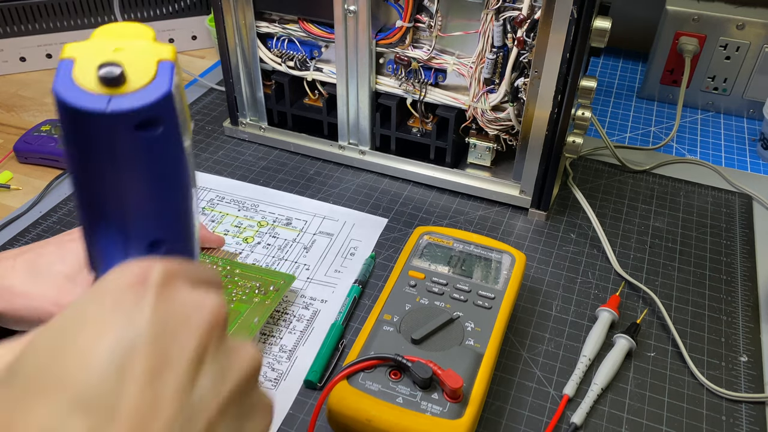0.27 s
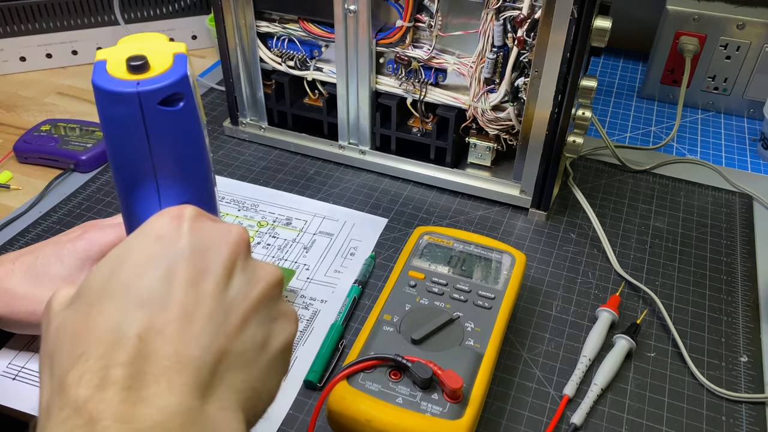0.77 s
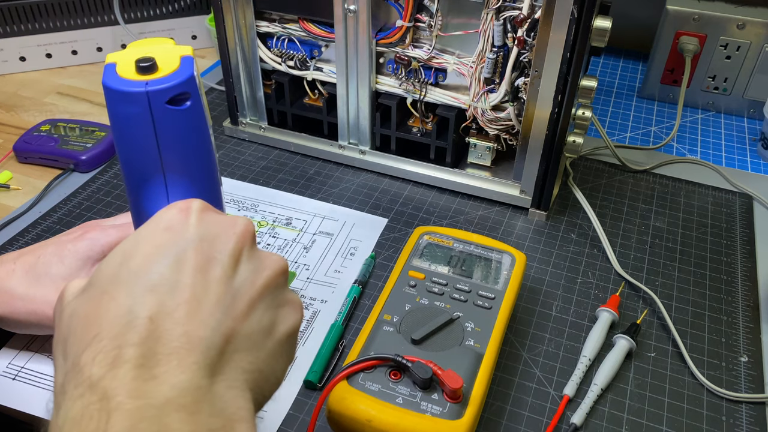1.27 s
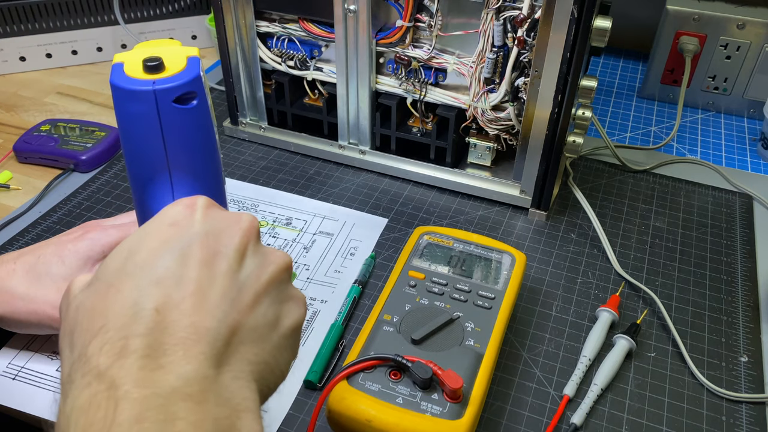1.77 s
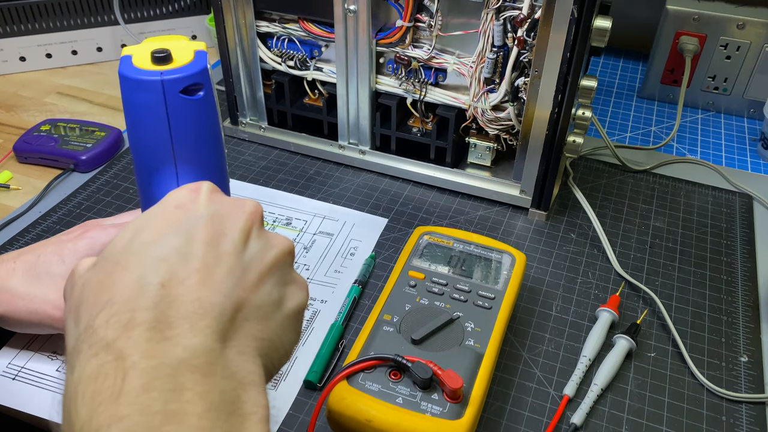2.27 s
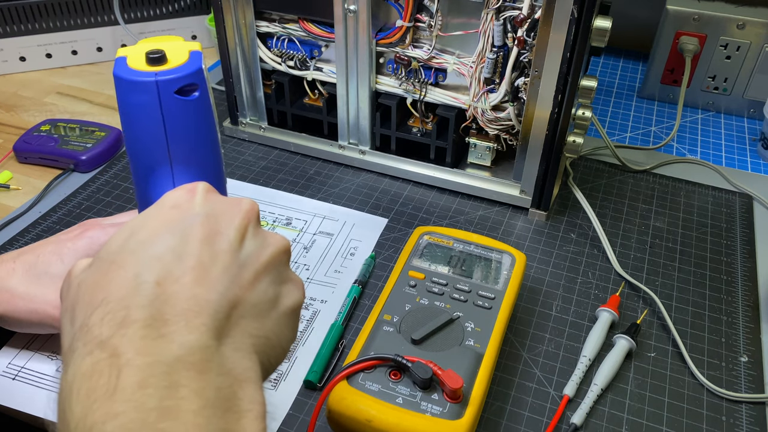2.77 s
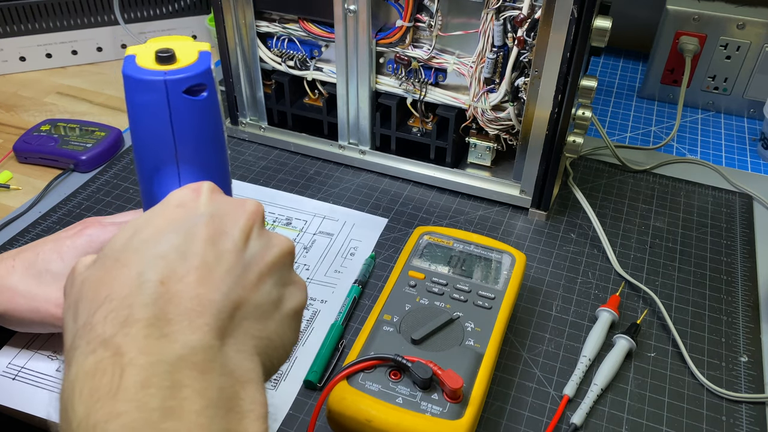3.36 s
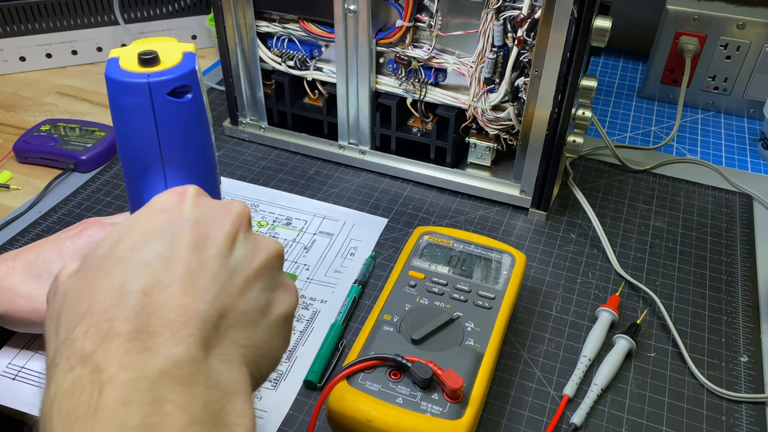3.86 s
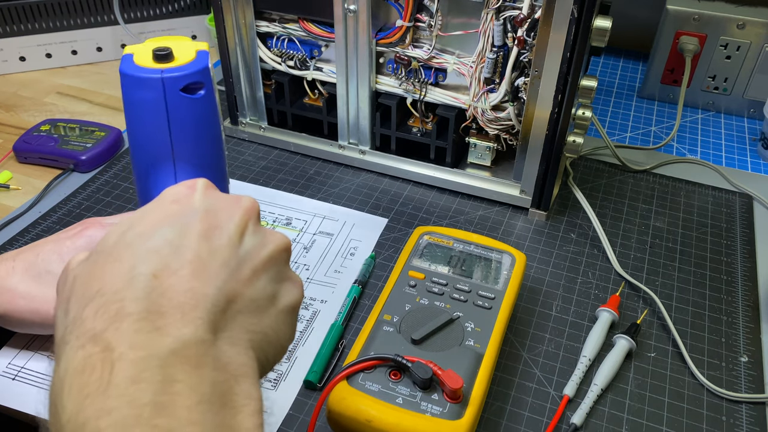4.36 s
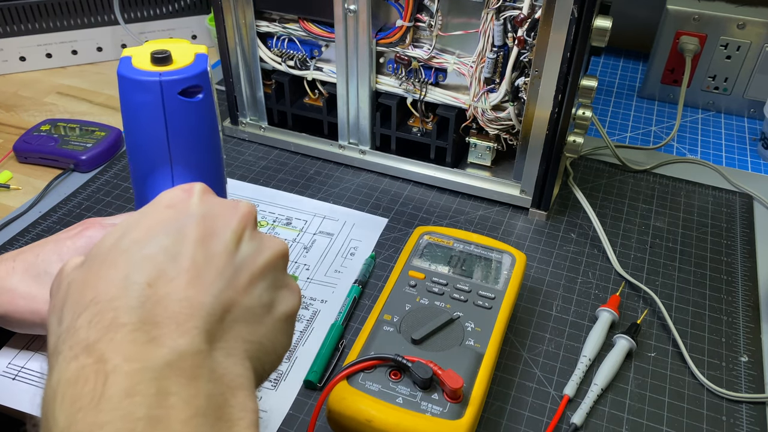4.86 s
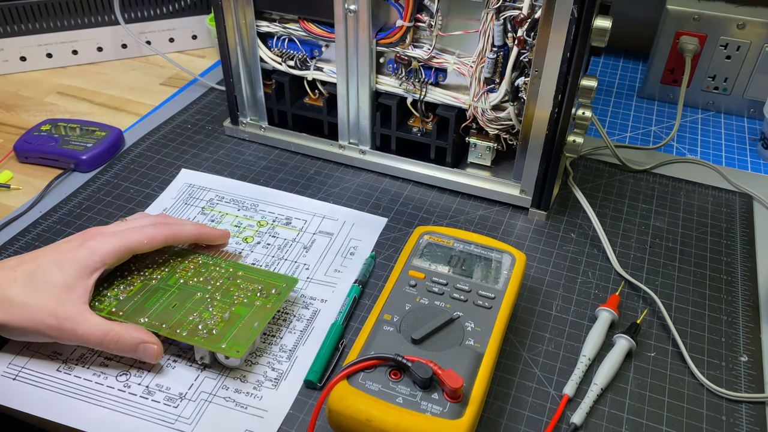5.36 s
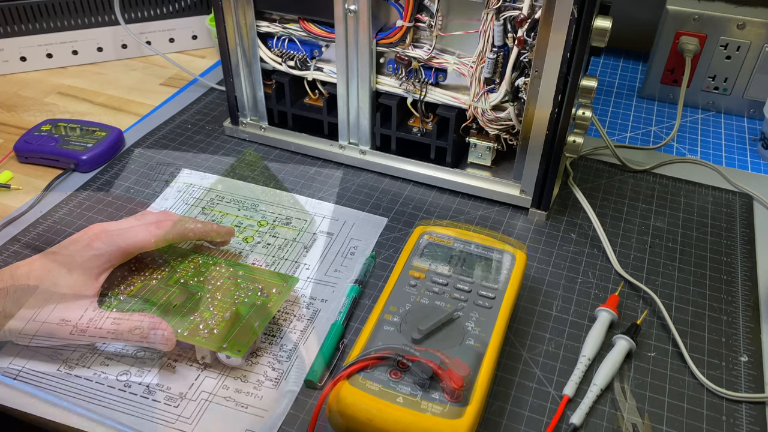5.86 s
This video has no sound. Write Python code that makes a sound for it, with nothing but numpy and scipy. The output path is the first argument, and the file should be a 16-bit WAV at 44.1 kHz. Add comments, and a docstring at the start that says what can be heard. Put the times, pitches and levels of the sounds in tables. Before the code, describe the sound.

A close microphone in a small, fairly dry room hears low fan noise and bench rumble. At 0.06-0.11 s, sharp tool clicks land with a heavy low jolt that briefly overloads, followed by smaller ticks to 0.3 s and a faint paper scrape. From about 0.9 to 1.9 s, very faint flux sizzle and thin gliding high whistles mix with light ticks. Trigger clicks at 2.75 s start a raspy, hollow pump buzz, about 77 strokes per second, spinning up quickly, with throbbing air hiss and tiny spits; it stops near 3.55 s. A dull pop comes at 3.77 s and the room noise drops. Shorter, duller, smeared buzzes run at 4.28-4.6 and 4.94-5.2 s, with soft clicks between. From 5.2 to 6.1 s, the board scrapes over paper in short tugs, with the strongest scratch at 5.5 s, hollow knocks around 5.6-5.7 s and a last bright tick.

```python
"""In a quiet room with a fan, a desoldering gun's diaphragm pump runs three times over a circuit board.
Each pump stroke is a pop coloured by the hose; filtered noise makes the air hiss at the nozzle.
Before that, hot flux sizzles (noise) and whistles faintly (gliding tones). Parts tick as short fading
bursts, the board scrapes over paper as grainy noise, and one dull pop follows the first run.
The bench sways under the microphone stand, once hard enough to overload the input."""
import sys
import numpy as np
from scipy import signal
from scipy.fft import rfft, irfft
from scipy.io import wavfile
from scipy.ndimage import uniform_filter1d

SR = 44100
rng = np.random.default_rng(int(sys.argv[2]) if len(sys.argv) > 2 else 0)


def inscribe(sig):
    """Save sig as 16-bit PCM at rate SR to the path in sys.argv[1].

    A 1-D sig is mono; a 2-D sig holds one channel per row.
    Samples are clipped to [-1, 1] before scaling.
    """
    pcm = np.round(np.clip(np.atleast_2d(sig).T, -1, 1) * 32767)
    wavfile.write(sys.argv[1], SR, pcm.astype(np.int16))


N = 269451
TIME = np.arange(N) / SR  # s
STROKE_HZ = 76.78  # reference stroke rate, also used to place the hose colour

# shaft speed, one list per run, each starting on a stroke: (t/s, speed/strokes per s)
SPEED = [
    [(2.7756, 51), (2.8, 72), (2.83, 72), (2.87, 77), (3.0, 77.6), (3.3, 76.2), (3.522, 77.3), (3.61, 8)],
    [(4.282, 70), (4.33, 77), (4.62, 77.3)],
    [(4.944, 71.3), (5.03, 76), (5.12, 77.8), (5.2, 76)],
]


def undb(db):
    """Turn decibels into gain."""
    return 10 ** (np.asarray(db) / 20)


def unit(x):
    """Scale to an rms (average strength) of 1."""
    return x / np.sqrt(np.mean(x ** 2))


def noise():
    """White noise: all pitches equally strong."""
    return rng.standard_normal(N)


def ring(x, hz, width):
    """One resonance, with gain 1 at its centre; hz and width in Hz."""
    return signal.lfilter(*signal.iirpeak(hz, hz / width, fs=SR), x)


def rings(x, table):
    """Several resonances side by side, added up."""
    return sum(undb(db) * ring(x, hz, width) for hz, width, db in table)


def colour(x, table, size=8192):
    """Shape the tone through (f/Hz, level/dB) points with a filter that never sounds ahead of its input."""
    hz, db = np.transpose(table)
    bins = np.arange(size // 2 + 1) * SR / size
    gain_db = np.interp(np.log(bins + 1), np.log(hz), db)
    # folding the cepstrum of the log gain puts all the filter's response after time zero
    cepstrum = irfft(np.log(undb(gain_db)))
    cepstrum[1:size // 2] *= 2
    cepstrum[size // 2 + 1:] = 0
    response = irfft(np.exp(rfft(cepstrum)))
    return signal.fftconvolve(x, response)[:N]


def read(tables):
    """Columns of several spans over time, and a gate that is open inside the spans."""
    s, *columns = np.transpose(np.concatenate(tables))
    gate = sum((TIME >= rows[0][0]) & (TIME <= rows[-1][0]) for rows in tables)
    soft_gate = uniform_filter1d(1. * gate, size=90)
    return soft_gate, [np.interp(TIME, s, column) for column in columns]


def walk(rate):
    """Smoothed random wavering of rms 1, with a new value rate times a second."""
    hold = int(SR / rate)
    steps = np.repeat(rng.standard_normal(N // hold + 1), hold)
    return unit(uniform_filter1d(uniform_filter1d(steps, hold), hold)[:N])


def reflect(x, delay, direct):
    """Lossless reflection: part of the pulse leaves at once, the rest after each round trip."""
    taps = np.zeros(int(delay * SR) + 1)
    taps[0], taps[-1] = 1, direct
    return signal.lfilter(taps[::-1], taps, x)


def room():
    """Room air and fan: coloured noise, with narrow bands of noise as unsteady hums."""
    # tone of the air noise: (f/Hz, relative level/dB)
    air_tone = [(56, -40.5), (95, -3.5), (155, -4.5), (254, -4.5), (302, -0.5), (390, -14.5), (624, -10.5),
                (725, -16), (918, -17.5), (3530, -40), (11000, -46), (14800, -54), (15800, -50)]
    # strength of the air noise: (t/s, level/dB)
    air_level = [(0, -47), (.5, -49.5), (3.76, -48), (3.77, -56.5), (6.11, -55.5)]
    # wavering hums over the air noise: (f/Hz, width/Hz, level relative to it/dB)
    fan_hums = [(147.6, 4.4, -14.5), (230.4, 11, -20), (298.5, 1.9, -10)]
    _, (level_db,) = read([air_level])
    hums = sum(undb(db) * unit(ring(noise(), hz, width)) for hz, width, db in fan_hums)
    return undb(level_db + .5 * walk(8.8)) * (unit(colour(noise(), air_tone)) + hums)


def bench():
    """The bench rings slowly after each jolt, sways under the hands and trembles: low noise and fading sines."""
    # ways the bench can ring: (f/Hz, time to fall 60 dB/s)
    modes = [(9.3, .62), (2.8, 1.6), (26, .25), (150, .2)]
    # jolts to the bench: (t/s, then the signed swing of each mode/sample value)
    jolts = [(.107, -1.4, .44, -.25, -.1), (5.246, .13, 0, -.3, 0), (5.44, -.07, 0, 0, 0),
             (5.6, .1, 0, 0, 0), (5.725, .09, 0, 0, 0), (5.86, -.06, 0, 0, 0)]
    # slow sway under the hands: (t/s, level before the low-pass/dB)
    sway_level = [(0, -17), (.11, -29), (.5, -34), (3.8, -30.5), (4.0, -36.5), (6.11, -31.5)]
    # trembling of the stand: (t/s, level/dB)
    tremble_level = [(0, -35.5), (1.0, -47), (1.4, -42), (3.7, -51), (4.0, -51.5), (5.2, -53), (5.3, -44),
                     (6.11, -51)]
    _, (sway_db,) = read([sway_level])
    _, (tremble_db,) = read([tremble_level])
    faster = ring(ring(noise(), 8, 10), 8, 16)
    slower = ring(ring(noise(), 2.5, 3), 2.5, 5)
    sway = undb(sway_db) * unit(faster + .6 * slower)
    sway = signal.sosfilt(signal.butter(4, 24, fs=SR, output="sos"), sway)
    tremble = signal.sosfilt(signal.butter(8, 58, fs=SR, output="sos"), ring(noise(), 37, 25))
    out = sway + undb(tremble_db + 2.0 * walk(2.4)) * unit(tremble)
    for s, *swings in jolts:
        t = np.maximum(TIME - s, 0)
        push = np.minimum(t / 0.0079, 1)  # builds over a few milliseconds
        for swing, (hz, t60) in zip(swings, modes):
            out = out + push * swing * np.exp(-np.log(1000) * t / t60) * np.sin(2 * np.pi * hz * t)
    return out


def scrape():
    """Solder points catch on paper fibres: dense uneven grains of noise ring the paper and the board."""
    # hand and board dragged over paper, one row per tug: (t/s, rise/s, hold/s, level/dB,
    # fade/dB per s, hollow ring relative to the middle/dB, treble relative to the middle/dB)
    tugs = [(0, 0.0009, 0.15, -63.5, 60, -20, 3), (.3, .05, .2, -76.5, 200, -20, -2.5),
            (5.191, .03, 0.041, -63.5, 299, -17.5, -4), (5.353, 0.012, 0.018, -59.5, 900, -14, -3),
            (5.465, 0.0062, 0.042, -44, 898, -3, -14), (5.493, .016, 0.00084, -22, 1048, -7, -35),
            (5.576, 0.01, .003, -53, 900, 3, -8), (5.598, 0.0042, 0.0009, -34, 357, -3, -15),
            (5.644, .004, 0.026, -47.5, 1150, 14.5, -3), (5.734, 0.0017, 0.041, -52, 899, 3, -8),
            (5.786, .003, 0.016, -42, 1096, -2, -2.5), (5.85, 0.017, .008, -65, 1995.5, 5, -11),
            (6.051, 0.024, .001, -46, 1600, -5, -4.5)]
    # resonances of the board: (f/Hz, width/Hz, relative level/dB)
    board_rings = [(593, 100, -5.5), (739, 58, 5), (940, 280, 0.5), (1314, 190, 2.5), (1900, 104, -3.5)]
    # resonances of the paper: (f/Hz, width/Hz, relative level/dB)
    paper_rings = [(1830, 190, 7.5), (2370, 1100, 6.5), (3870, 1600, -3.5), (5030, 1200, -6.5)]
    onset_db = 23.5  # depth from which a tug rises
    grains = noise() * undb(1.8 * walk(500) + 2.6 * walk(120))
    middle = unit(ring(rings(grains, paper_rings), 3300, 7000))
    # played backwards, the same grains no longer line up with the middle
    treble = unit(ring(ring(ring(grains[::-1], 7700, 6000), 9400, 5500), 8900, 8000))
    hollow = unit(ring(ring(rings(grains, board_rings), 1000, 1500), 1000, 1800))
    out = np.zeros(N)
    for s, rise, hold, db, fade, hollow_db, treble_db in tugs:
        t = TIME - s
        below_db = onset_db * np.clip(1 - t / max(rise, .001), 0, 1)
        level_db = db - below_db - fade * np.maximum(t - rise - hold, 0)
        mix = middle + undb(hollow_db) * hollow + undb(treble_db) * treble
        out += (t > 0) * undb(level_db) * mix
    return out


def ticks():
    """Short bursts: a ring at the part's pitch, a crack of treble and a knock through the bench."""
    # ticks of tool, trigger and parts: (t/s, level/dB, f/Hz, treble relative to the ring/dB,
    # knock relative to the ring/dB, time to fall 60 dB/s)
    hits = [(0.0601, -24.5, 2200, -4.5, -14, 0.091), (0.1073, -25.5, 3620, -10, 1.5, 0.012),
            (0.2387, -45.5, 2000, -10, -6, 0.078), (0.2746, -36, 2320, -5.5, -28, 0.084),
            (1.395, -48, 1150, -6, -14, 0.06), (1.415, -43, 1470, -26, -16, 0.12),
            (1.479, -54, 1260, -4, -9, 0.051), (1.5678, -39, 1450, -14.5, -25, 0.091),
            (1.6377, -53, 1520, -7, -3, 0.14), (2.0658, -53.5, 1660, -9, -1, 0.15),
            (2.197, -54.5, 1310, -4, 0, 0.06), (2.298, -55, 1630, 6.5, -9, 0.054),
            (2.74, -45.5, 1330, 12, -13, 0.082), (2.7547, -40.5, 1980, 9.5, -15, 0.079),
            (3.8738, -55, 1580, -21, -5, 0.06), (3.949, -42, 1310, -26, -19, 0.043),
            (4.708, -50, 1200, -30, -27, 0.04), (4.737, -44.5, 1255, -39, -16, 0.062),
            (5.2515, -53.5, 1410, 4.5, 11, 0.028), (5.3158, -51.5, 1170, -5, 2.5, 0.08),
            (5.471, -46, 1670, -1, 1, 0.054), (5.5995, -29, 1250, -27, -10.5, 0.13),
            (5.6792, -31, 1260, -6, -1.5, 0.018), (5.737, -40, 1940, -19, -10, 0.34),
            (6.076, -37.5, 4650, -8, -30, 0.047)]
    out, t = np.zeros(N + 8192), TIME[:8192]
    draws = rng.standard_normal((len(hits), 2, len(t)))
    for (s, db, hz, treble_db, knock_db, t60), (a, b) in zip(hits, draws):
        contact = 1.08 * np.exp(-t / 0.0014)  # a sharp first contact
        fall = np.exp(-np.log(1000) * t / t60) + contact
        pitch = unit(ring(ring(ring(a, hz, 0.25 * hz), hz, 1.04 * hz), hz, 1.7 * hz))
        crack = unit(ring(ring(ring(b, 8500, 7000), 7730, 9100), 8000, 6000))
        thud = unit(ring(ring(b, 220, 400), 250, 760))
        knock = np.sqrt(2) * np.sin(2 * np.pi * 520 * t) + thud
        burst = pitch + undb(treble_db) * crack + undb(knock_db) * knock
        first = int(s * SR)
        out[first:first + len(t)] += undb(db) / 2 * fall * burst
    return out[:N]


def flux():
    """Thin wavering whistles of vapour leaving the hot joint (gliding sines), over a faint sizzle of noise."""
    # whistles, each a glide over one bend: (t/s, bends after/s, lasts/s,
    # start f/Hz, bend f/Hz, end f/Hz, level at the bend/dB)
    whistles = [(.95, .08, .24, 9200, 10480, 10950, -69), (1.0, .305, .488, 6450, 8130, 6570, -69),
                (1.02, .1, .17, 9700, 9800, 9700, -74), (1.03, .17, .21, 11500, 13300, 14800, -84),
                (1.17, .14, .25, 11900, 12700, 11600, -72), (1.195, .13, .247, 9800, 9930, 9410, -59),
                (1.2, .1, .42, 12200, 13050, 10000, -78), (1.2, .1, .2, 7200, 6900, 7100, -75),
                (1.24, .07, .18, 11100, 11500, 10500, -75), (1.37, .08, .29, 15000, 13000, 10300, -84),
                (1.45, .31, .425, 10200, 8150, 6850, -70)]
    # flux boiling on the joint: (t/s, level/dB)
    sizzle_level = [(0.9, -85), (1.11, -75), (1.474, -66.5), (1.5, -75), (1.75, -95), (2.28, -80),
                    (2.5, -83)]
    edge_db = 3.5  # how much weaker a whistle is at both ends
    gate, (sizzle_db,) = read([sizzle_level])
    sizzle = unit(ring(ring(noise(), 6300, 7300), 6800, 8500))
    out = gate * undb(sizzle_db + 2.0 * walk(30.1)) * sizzle
    for s, bend, length, first, middle, last, db in whistles:
        glide = [(s, first, db - edge_db), (s + bend, middle, db), (s + length, last, db - edge_db)]
        gate, (hz, level_db) = read([glide])
        wavering_hz = uniform_filter1d(hz, size=2500) * (1 + 0.0026 * walk(34))
        tone = np.sqrt(2) * np.sin(2 * np.pi * np.cumsum(wavering_hz) / SR)
        out = out + gate * undb(level_db + 1.1 * walk(41.3)) * tone
    return out


def shaft():
    """Turns of the shaft, found by adding up its speed from the start of each run."""
    turns = TIME * STROKE_HZ
    for rows in SPEED:
        s, rate = np.transpose(rows)
        first = int((s[0] - .02) * SR)  # begin counting 20 ms early
        count = np.cumsum(np.interp(TIME[first:], s, rate)) / SR
        turns[first:] = count - count[int(.02 * SR)]  # zero at the start of the run
    return turns


def runs():
    """Settings of the current run, time since its start and since its fade began, and the nozzle's leak (0-1)."""
    # (start t/s, nozzle sealed t/s, seal lifts t/s, fade begins t/s, pump level/dB,
    # extra while leaking/dB, onset depth/dB, rise/s, fade/dB per s, nozzle ring while leaking/dB,
    # valve flutter while leaking/dB, air level/dB, air leads/s, smeared 0 or 1)
    run_table = np.array([(2.773, 2.885, 3.455, 3.53, -21.5, 5, 14, .03, 230, 3, -17, -36, .001, 0),
                          (4.277, 4.35, 4.54, 4.588, -22.5, -4, 22, .014, 1200, 0, -1, -42, .012, 1),
                          (4.94, 5.03, 5.11, 5.165, -24, 1.5, 22, .018, 1100, 0, 2, -43, .018, 1)])
    # each row takes over 50 ms before its start
    current = np.searchsorted(run_table[:, 0] - .05, TIME) - 1
    row = run_table[np.clip(current, 0, None)].T
    start, sealed, lifts, fade_start = row[:4]
    # the seal takes 0.04 s to close or open
    leak = np.clip(np.maximum(sealed - TIME, TIME - lifts) / .04, 0, 1)
    return row[4:], np.maximum(TIME - start, -.05), np.maximum(TIME - fade_start, 0), leak


def air(turns):
    """Air hisses through the nozzle as noise that throbs with each stroke, with a few short spits."""
    # tone of the hiss: (f/Hz, relative level/dB)
    hiss_tone = [(1470, -29.5), (2500, -12.5), (3130, -19.5), (4000, -11.5), (4710, -13), (6970, -7.5),
                 (7830, -4.5), (12200, -11.5), (15800, -35)]
    # resonances added to the hiss: (f/Hz, width/Hz, gain/dB)
    hiss_rings = [(7680, 140, 4.5), (8990, 400, -5)]
    # solder shoots up the nozzle: (t/s, level/dB)
    spits = [(2.76, -41), (2.955, -35), (3.174, -33), (3.46, -28.5)]
    spit_decay = 0.0018  # s
    rise, onset_db, leak_db = 0.017, 26.5, 1.5  # rise in s; depth at the start; extra while leaking
    (*_, fade, _, _, air_db, lead, _), since, fading, leak = runs()
    since = np.maximum(since + lead, 0)
    level_db = air_db + leak_db * leak - onset_db * np.exp(-since / rise) - fade * fading
    level = (since > 0) * undb(level_db)
    level = level + sum(undb(db) * np.exp(-np.abs(TIME - s) / spit_decay) for s, db in spits)
    hiss = colour(noise(), hiss_tone)
    throb = 1 + 0.3 * np.cos(2 * np.pi * (turns - .75)) + 0.14 * walk(140)
    return level * unit(throb * (hiss + rings(hiss, hiss_rings)))


def pump(turns):
    """Strokes pop through hose and nozzle as the valve flutters; the pop is smeared and duller in later runs."""
    # colour of hose and housing: (multiple of STROKE_HZ, relative level/dB)
    hose_tone = [(1, -3), (2, -3), (3, -2), (4, -12), (5, -4), (6, -5), (7, -4), (8, -6), (9, 0), (10, -7),
                 (11, -8), (12, -1), (13, -8), (14, -13), (15, -15), (16, -12), (17, -9), (18, -13),
                 (19, -11), (20, -13), (21, -22), (22, -22), (23, -20), (24, -22), (25, -25), (26, -19),
                 (27, -25), (28, -20), (29, -22)]
    # resonances of the nozzle: (f/Hz, width/Hz, relative level/dB)
    nozzle_rings = [(698, 88, 5), (916, 30, 0.5), (1334, 30, 1), (2095, 170, -43)]
    # reflections inside the hose: (delay/s, direct share)
    hose_ends = [(.0044, .85), (.0076, .9)]
    sag, sealed_ring_db, sealed_flutter_db = 3, -36, -10  # sag in dB per s
    gate, _ = read(SPEED)
    settings, since, fading, leak = runs()
    hold_db, extra_db, onset_db, rise, fade, ring_db, flutter_db, _, _, smeared = settings
    since = np.maximum(since, 0)
    level_db = hold_db - sag * since + extra_db * leak
    level_db = level_db - onset_db * np.exp(-since / rise) - fade * fading
    ring_db = sealed_ring_db + (ring_db - sealed_ring_db) * leak
    flutter_db = sealed_flutter_db + (flutter_db - sealed_flutter_db) * leak

    # strokes differ slightly in size
    stroke_number = np.floor(turns + .5).astype(int) % 256
    size = undb(0.14 * rng.standard_normal(256))[stroke_number]
    # many cosines in step add up to one sharp pulse per turn
    stroke = -size * unit(sum(np.cos(2 * np.pi * k * turns) for k in range(1, 32)))
    pops = stroke
    for delay, direct in hose_ends:
        pops = reflect(pops, delay, direct)
    late = pops
    for hz, width in [(250, 277), (600, 110), (850, 290), (1200, 860), (1700, 1500)]:
        late = late - 2 * ring(late, hz, width)  # all-pass: delays one band, keeps its level
    late = signal.lfilter(*signal.butter(1, 1500, fs=SR), late)  # a gentle low-pass dulls the smeared pops

    gust = .5 + np.exp(-(turns % 1) / 0.16)  # strongest at the start of each turn
    flutter = unit(gust * ring(ring(noise(), 1300, 1500), 1300, 1500))
    rasp = unit(gust * ring(ring(noise(), 1900, 900), 1900, 900))  # the valve edge always rasps a little
    valve = undb(flutter_db) * flutter + undb(-10.0) * rasp

    drive = (1 - smeared) * pops + smeared * unit(late) + valve
    hose_points = [(k * STROKE_HZ, db) for k, db in hose_tone]
    hose = unit(colour(drive, [(30, -41.5)] + hose_points + [(2480, -48), (6000, -93)]))
    nozzle = unit(rings(stroke + valve, nozzle_rings))
    share = undb(ring_db)
    return gate * undb(level_db) * (hose + share * nozzle) / np.sqrt(1 + share ** 2)


def pop():
    """A dull pop: the signal jumps at once and falls back smoothly."""
    # (t/s, jump/sample value, decay/s)
    s, step, decay = (3.7668, .075, .014)
    return step * (TIME >= s) * np.exp(-np.maximum(TIME - s, 0) / decay)


def echo(x, t60=0.14, wet_db=-18):
    """The small room answers with a short diffuse tail of fading noise; t60 is the time to fall 60 dB in s."""
    t = TIME[:16384]
    tail = rng.standard_normal(len(t)) * np.exp(-np.log(1000) * t / t60) * (t > .004)
    tail = tail / np.sqrt(np.sum(tail ** 2))
    return x + undb(wet_db) * signal.fftconvolve(x, tail)[:N]


def scene():
    """Everything at the microphone; flux, bench and room get no echo."""
    turns = shaft()
    echoing = scrape() + ticks() + air(turns) + pump(turns) + pop()
    return (echo(echoing) + flux() + bench() + room())[None]


def record(dry):
    """The input overloads flat at a fixed limit; then a steep low-pass cuts the top."""
    limit, top_hz = .617, 15800  # limit as a sample value
    low_pass = signal.ellip(10, .2, 70, top_hz, fs=SR, output="sos")
    return signal.sosfilt(low_pass, np.clip(dry, -limit, limit))


dry = scene()
out = record(dry)
inscribe(out)
```